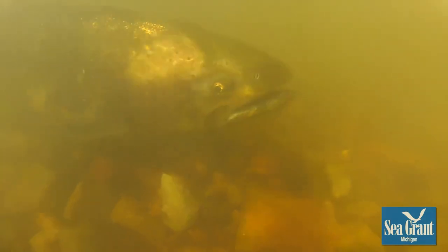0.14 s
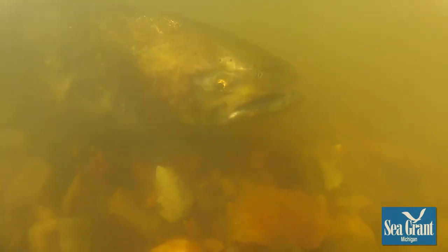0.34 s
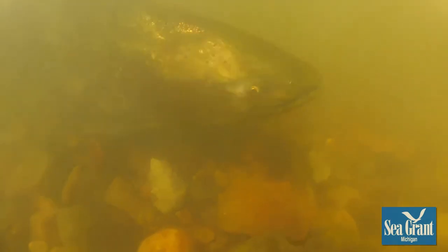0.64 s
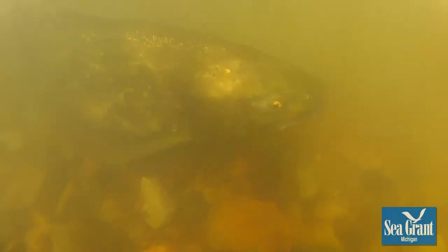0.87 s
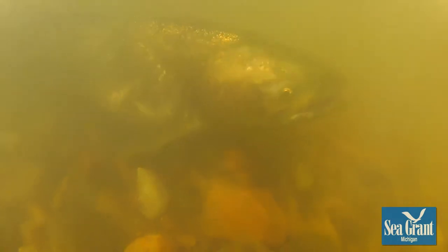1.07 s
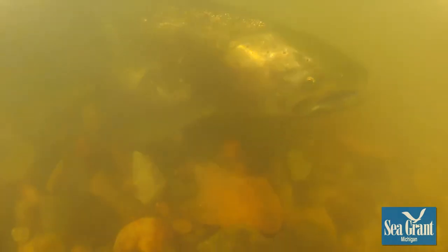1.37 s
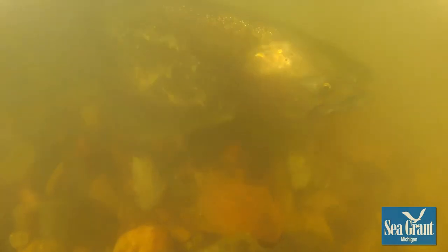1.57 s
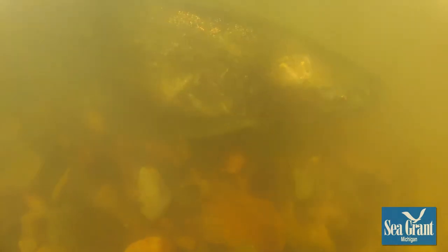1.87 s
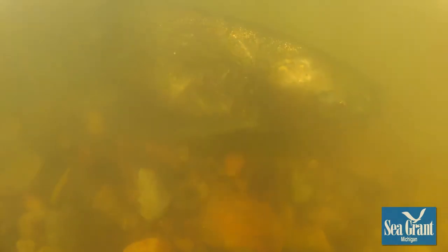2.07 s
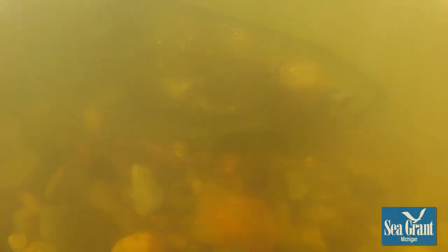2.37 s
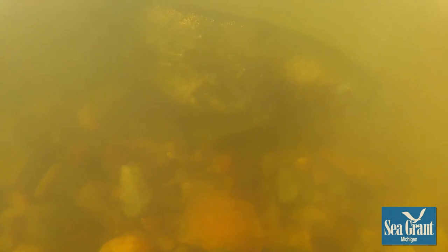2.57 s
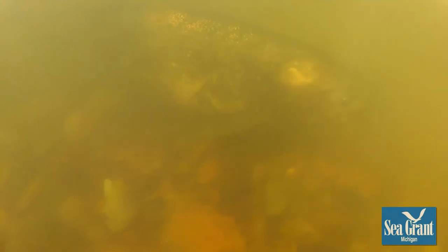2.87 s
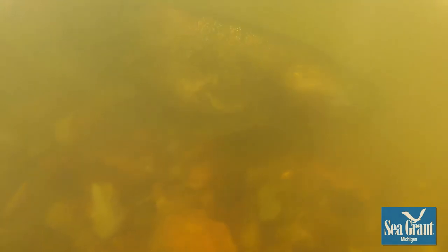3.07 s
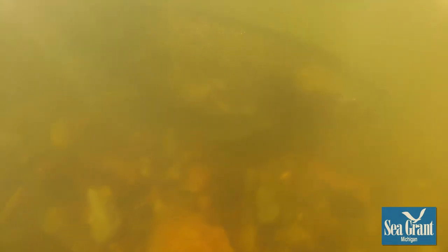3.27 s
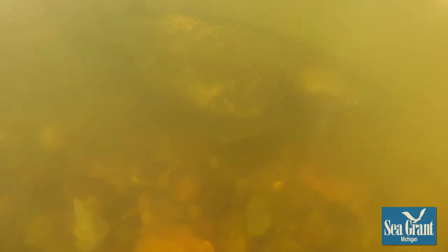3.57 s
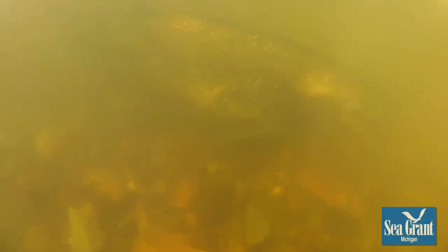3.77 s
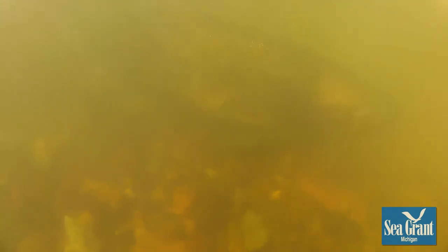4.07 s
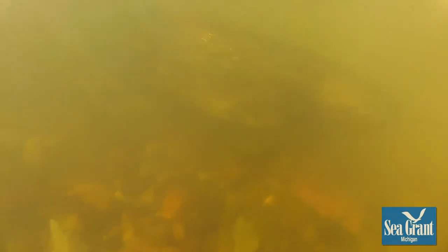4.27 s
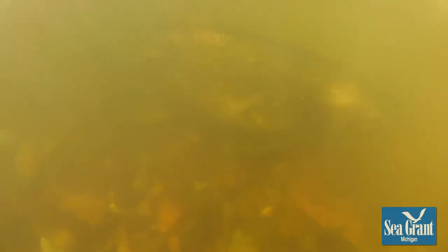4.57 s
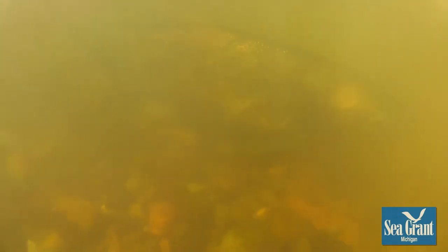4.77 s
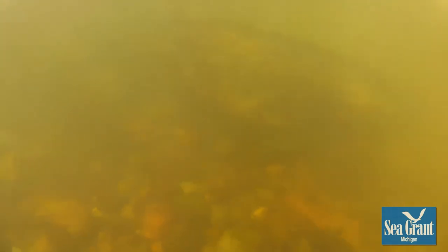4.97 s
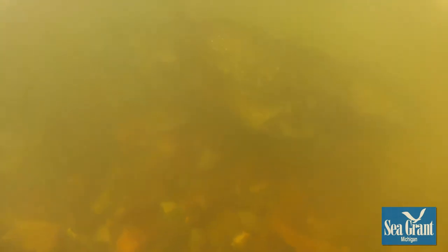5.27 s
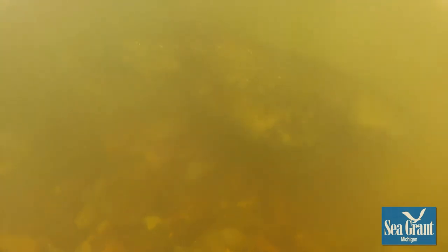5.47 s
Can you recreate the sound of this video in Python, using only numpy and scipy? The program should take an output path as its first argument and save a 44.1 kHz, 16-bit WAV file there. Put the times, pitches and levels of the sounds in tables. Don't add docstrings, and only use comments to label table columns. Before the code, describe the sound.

Underwater in a stony river, heard from inside a sealed camera housing on a pole. Deep uneven rumble runs throughout, with gritty hollow rubbing. Tiny bubble pings cluster at the start, then a couple of gurgling bloops. Rubbing thins in the middle, a hard knock lands near two and a half seconds, and scraping returns stronger with more knocks near the end. Close, muffled, lo-fi mono.

```python
import sys
import numpy as np
from scipy import signal
from scipy.fft import rfft, irfft
from scipy.io import wavfile
from scipy.ndimage import uniform_filter1d

SR = 44100
rng = np.random.default_rng(int(sys.argv[2]) if len(sys.argv) > 2 else 0)


def dump(signal):
    limited = np.clip(np.atleast_2d(signal).T, -1, 1)
    pcm = np.round(limited * 32767).astype(np.int16)
    wavfile.write(sys.argv[1], SR, pcm)


def to_linear_factor(level_db):
    exponent = np.asarray(level_db, float) / 20
    return 10 ** exponent


N = 248724
T = np.arange(N) / SR

# time in seconds, pressure in dB, slip speed in dB.
CONTACT_CURVE = [(0, -56, -6), (.23, -61, -7.5), (.35, -53, -7.5), (.8, -56, -5.5), (1.15, -56, -9.5),
                 (1.3, -72, -9), (1.5, -73, -9), (2.8, -76, -10), (2.95, -57, -3.5), (3.1, -55, -4.5),
                 (3.7, -60, -7), (3.9, -58.5, -5.5), (4.45, -54.5, -7.5), (4.63, -66, -3),
                 (4.75, -52.5, -4.5), (5.1, -52, -3), (5.43, -51.5, -6), (5.64, -54.5, -1)]
# middle in seconds, length in seconds, level in dB, thick-mode share in dB.
SCRAPE_EVENTS = [(0, 0.017, -47, -3), (.06, 0.063, -65, 9.5), (.282, 0.064, -49.5, -18),
                 (.37, 0.095, -56.5, 5.5), (.458, 0.014, -46.5, -11), (.705, 0.055, -55.5, -5),
                 (.917, 0.063, -53.5, -5), (1.012, .04, -58, -4), (1.12, 0.11, -53.5, -12),
                 (1.388, 0.038, -59.5, 1.5), (1.55, 0.07, -66.5, -5), (1.783, 0.047, -52.5, -6),
                 (1.89, 0.05, -52.5, -4), (2.18, 0.12, -58.5, -3.5), (2.414, .025, -68, -12),
                 (2.48, 0.031, -53.5, -4), (2.53, 0.067, -49.5, 1), (2.792, 0.03, -50.5, -9),
                 (3.274, .05, -52, -2), (3.5, 0.056, -55.5, 2.5), (3.62, 0.2, -52.5, -11),
                 (4.036, 0.031, -57.5, -3), (4.2, 0.044, -56.5, 3.5), (4.44, 0.2, -51.5, -4),
                 (4.668, 0.032, -52, 8), (4.9, .05, -55, -1), (4.981, 0.036, -54.5, 13),
                 (5.281, 0.058, -49.5, -6), (5.36, 0.076, -54, -18), (5.51, 0.12, -51.5, 0)]
SCRAPE_RISE = 0.42
FULL_PRESSURE_DB = -55


def level(x, db):
    return x * to_linear_factor(db) / np.sqrt(np.mean(x ** 2))


def columns(table):
    s, *cols = np.transpose(table)
    return [np.interp(T, s, c) for c in cols]


def walk(rate):
    k = int(SR / rate)
    points = rng.standard_normal(N // k + 2)
    joined = np.interp(np.arange(N) / k, np.arange(N // k + 2), points)
    return 1.62 * uniform_filter1d(joined, k)


def steep(x, hz, kind):
    return signal.sosfilt(signal.butter(4, hz, kind, fs=SR, output="sos"), x)


def band(x, low_hz, high_hz):
    return steep(steep(x, high_hz, "low"), low_hz, "high")


def resonate(x, modes, patchy_db=0.):
    out = 0
    for k, (hz, width, db) in enumerate(modes):
        push = x * to_linear_factor(patchy_db * walk(12)) if patchy_db else x
        mode = signal.lfilter(*signal.iirpeak(hz, hz / width, SR), push)
        out = out + (-1) ** k * to_linear_factor(db) * mode
    return level(out, 0)


def even(x, s, share):
    k = int(s * SR)
    power = uniform_filter1d(uniform_filter1d(x ** 2, k), k) + 1e-12
    return level(x / power ** (np.clip(share, 0, 1) / 2), 0)


def swells(table, share=0, rise=1):
    t = T[::32]
    power = 0
    for row in table:
        middle_s, length_s, db = row[:3]
        half_s = length_s * np.where(t < middle_s, rise, 1)
        bell = np.exp(-np.log(16) * ((t - middle_s) / half_s) ** 2)
        power = power + to_linear_factor(db + share * row[-1]) ** 2 * bell
    return np.interp(T, t, power)


def add(out, i, piece):
    out[i:i + len(piece)] += piece
    return out


def ring(out, s, hz, db, t60, glide=0., rise=0.0022):
    i = int(s * SR)
    t = T[:min(int(t60 * SR), N - i)]
    tone = np.sin(2 * np.pi * hz * t * (1 + glide * t / t60))
    return add(out, i, to_linear_factor(db - 60 * t / t60) * (1 - np.exp(-t / rise)) * tone)


def crack(out, s, db, t60):
    t = T[:int(.05 * SR)]
    snap = band(rng.standard_normal(len(t)), 980, 2800)
    return add(out, int(s * SR), to_linear_factor(db - 60 * t / t60) * snap)


def grit(rate, spread_db, smooth_db):
    chance = rng.random((2, N))
    happens = chance[0] < rate / SR
    size = to_linear_factor(-spread_db * np.log(chance[1] + 0.016))
    slips = happens * size * rng.standard_normal(N)
    return level(slips, 0) + to_linear_factor(smooth_db) * rng.standard_normal(N)


def rub_db():
    steady = to_linear_factor(columns(CONTACT_CURVE)[0]) ** 2
    return 10 * np.log10(steady + swells(SCRAPE_EVENTS, rise=SCRAPE_RISE))


def current():
    # frequency in Hz, width in Hz, level in dB.
    sway_modes = [(36.1, 7.8, -3), (50.7, 8.4, -13.5), (23, 13.5, -5.5)]
    shake_modes = [(97.7, 10.6, 6), (76.6, 43.6, 0), (107, 16.4, -3.5)]
    flutter_modes = [(127, 14, 1.5), (190.6, 13.7, -5)]
    # time in seconds, level in dB.
    flow_curve = [(0, -50), (.6, -46), (.95, -42.5), (1.8, -46), (2.2, -49.5), (2.7, -45.5), (3.1, -45.5),
                  (3.6, -47.5), (4.1, -47), (4.6, -48.5), (5.1, -44.5), (5.64, -48)]
    # middle in seconds, length in seconds, level in dB.
    large_eddies = [(0.031, 0.051, -34.5), (0.18, 0.034, -38.5), (0.464, 0.047, -37.5), (0.54, .05, -39),
                    (0.76, .04, -55), (0.84, 0.12, -41), (1.0, 0.1, -44), (1.212, 0.037, -43.5),
                    (1.43, 0.055, -45), (1.63, 0.032, -35.5), (1.799, 0.087, -46), (2.108, 0.066, -44.5),
                    (2.316, 0.075, -44.5), (2.816, 0.082, -40.5), (2.972, 0.041, -43),
                    (3.141, 0.091, -41.5), (3.53, 0.038, -44), (3.641, 0.032, -43), (3.78, 0.033, -44),
                    (4.009, 0.07, -42.5), (4.161, 0.046, -35), (4.279, 0.05, -39), (4.45, 0.14, -42),
                    (4.785, 0.053, -41), (5.172, 0.049, -37.5), (5.371, 0.074, -41.5), (5.5, .05, -45),
                    (5.639, 0.11, -37.5)]
    # middle in seconds, length in seconds, level in dB,
    # flutter share in dB.
    small_eddies = [(.05, 0.061, -41.5, -6.5), (.29, 0.073, -47, -1), (.44, 0.095, -41, -15.5),
                    (.66, 0.09, -48, -3.5), (1.05, 0.075, -46, -5), (1.22, 0.079, -49, -4),
                    (1.43, 0.056, -47, -6.5), (1.64, 0.049, -57, -8), (1.78, 0.11, -48, -6.5),
                    (1.85, 0.047, -42.5, -12), (1.95, 0.051, -39.5, -12), (2.22, 0.11, -46, -7.5),
                    (2.62, 0.057, -48, -14), (2.73, 0.043, -46, -25), (2.8, 0.042, -49.5, -3),
                    (2.94, 0.062, -46.5, -7.5), (3.4, 0.12, -54.5, 1), (3.55, 0.11, -57, 4.5),
                    (4.07, 0.053, -48.5, -3), (4.2, 0.29, -51.5, -1), (4.5, 0.1, -50.5, 0.5),
                    (4.7, 0.1, -42, -11), (4.88, .08, -44.5, -7.5), (5.15, 0.088, -46.5, -10),
                    (5.29, 0.041, -52.5, 5.5), (5.385, .09, -52.5, -2.5), (5.567, .11, -45.5, -10)]

    sway = steep(resonate(rng.standard_normal(N), sway_modes), 93.6, "low")
    shake = band(resonate(rng.standard_normal(N), shake_modes), 57, 133)
    flutter = band(resonate(rng.standard_normal(N), flutter_modes), 115, 243)

    flow_db = columns(flow_curve)[0]
    shake_db = flow_db - 11
    flutter_db = flow_db - 12 + 0.51 * (rub_db() - FULL_PRESSURE_DB)
    sway_gain = np.sqrt(to_linear_factor(flow_db) ** 2 + swells(large_eddies))
    shake_gain = np.sqrt(to_linear_factor(shake_db) ** 2 + swells(small_eddies))
    flutter_gain = np.sqrt(to_linear_factor(flutter_db) ** 2 + swells(small_eddies, 1))
    return (even(sway, 0.14, 0.53) * sway_gain
            + even(shake, 0.087, 0.5) * shake_gain
            + even(flutter, 0.087, 0.54) * flutter_gain)


def rubbing():
    # frequency in Hz, width in Hz, level in dB.
    thick_modes = [(221.3, 29, -1), (251, 43, 2.5), (300, 36, -2.5), (371.5, 35, -6)]
    early_shell_modes = [(393.4, 85, 0.5), (488, 16.5, 5), (579, 129, 0.5), (687.4, 59, 2.5),
                         (847, 380, -10), (1123, 430, -9.5), (1196, 76, -2.5), (1350, 67, -8.5),
                         (1473, 68, -10.5), (1660, 290, -13)]
    late_shell_modes = [(414, 163, -9.5), (486, 64, -1), (600.4, 40, 2), (667, 54, -0.5), (714, 59, -4),
                        (893, 34, -5), (984, 31, -9), (1064, 78, -12), (1315, 63, -4), (1640, 210, -19.5),
                        (1698, 41, -16)]
    bright_modes = [(2164, 360, 1), (2722, 62, 1), (3000, 92, -3.5), (3610, 430, -8.5), (4400, 760, -14),
                    (5220, 320, -16)]
    grip_change_s, grip_fade_s = 2.9, 0.062

    db = rub_db()
    pressure_db, speed_db = columns(CONTACT_CURVE)
    slips = grit(1200, 1.6, 2.9) * to_linear_factor(2.8 * walk(35))
    late = np.clip((T - grip_change_s) / grip_fade_s, 0, 1)
    early_shell = resonate(slips, early_shell_modes, patchy_db=1.5)
    late_shell = resonate(slips, late_shell_modes, patchy_db=2.5)
    shell = (1 - late) * early_shell + late * late_shell

    hollow = even(band(shell, 375, 816), 0.035, 0.85)
    scratch = even(band(shell, 940, 2370), 0.036, 0.82)
    thick = even(band(resonate(slips, thick_modes), 171, 398), 0.041, 0.44)
    bright = steep(resonate(slips, bright_modes, patchy_db=2.0), 2160, "high")

    bright_db = FULL_PRESSURE_DB - 13 + speed_db + 1.5 * late + 0.8 * (db - FULL_PRESSURE_DB)
    thick_db = -61 + 0.48 * (pressure_db - FULL_PRESSURE_DB)
    thick_gain = np.sqrt(to_linear_factor(thick_db) ** 2 + swells(SCRAPE_EVENTS, 0.95, SCRAPE_RISE))
    return (to_linear_factor(db) * (hollow + scratch * to_linear_factor(speed_db))
            + thick * thick_gain
            + even(bright, 0.022, 0.66) * to_linear_factor(bright_db))


def knocks():
    # start in seconds, body peak in dB, bass in dB, shell in dB,
    # decay t60 in seconds.
    blows = [(0.278, -61, -37.5, -47, 0.18), (0.448, -57, -44, -56, 0.11), (1.106, -64, -44, -35, 0.31),
             (1.77, -55.5, -42, -53, 0.1), (2.511, -22.5, -25, -32, 0.15), (2.785, -42, -61, -51, 0.28),
             (4.664, -41.5, -48.5, -27.5, 0.17), (4.969, -30, -34, -35, 0.17),
             (4.979, -34, -24.5, -35, 0.33), (5.275, -38.5, -40, -53, 0.24)]
    # frequency in Hz, level in dB, decay t60 in seconds.
    bass_modes = [(43.4, -1, 0.48), (97, -6, 0.3), (136.5, -7.5, 0.28)]
    body_modes = [(240.8, -5, 0.32), (332, -1, 0.04), (478, 4, 0.031), (905, -3.5, 0.019)]
    # frequency in Hz, level in dB, share of the blow's t60.
    shell_modes = [(601, -2, 1), (640, 0.5, 0.25), (890, -6, 0.24), (1280, -28.5, 0.36)]

    out = np.zeros(N)
    for s, body_db, bass_db, shell_db, t60 in blows:
        out = crack(out, s + 0.00141, body_db - 25.0, 0.09)
        for hz, db, ring_s in bass_modes:
            out = ring(out, s + 0.0046, hz, bass_db + db + 3.0, ring_s, rise=0.0027)
        for hz, db, ring_s in body_modes:
            out = ring(out, s + 0.0018, hz, body_db + db - 5.5, ring_s)
        for hz, db, share in shell_modes:
            out = ring(out, s, hz, shell_db + db - 11.0, share * t60)
    return out


def bubbles():
    # start in seconds, peak in dB, pitch in Hz, t60 in seconds.
    pings = [(0.0473, -38.5, 1670, 0.0073), (0.0574, -56, 2700, 0.044), (0.0712, -51, 2370, 0.041),
             (0.0912, -61, 5400, 0.019), (0.0944, -50.5, 1660, 0.036), (0.1346, -52, 3630, 0.031),
             (0.185, -40.5, 2420, 0.032), (0.185, -59, 5730, 0.026), (0.204, -53, 2160, 0.035),
             (0.4888, -53.5, 2330, 0.045), (1.4381, -59, 2330, 0.046), (1.9934, -61.5, 2530, 0.056),
             (2.3032, -57, 2430, 0.04), (2.3585, -60, 4770, 0.019), (2.374, -52, 2210, 0.037),
             (2.4573, -60, 1990, 0.044), (2.6309, -51.5, 2020, 0.021), (2.7444, -65, 1450, 0.045)]
    # start in seconds, peak in dB, pitch in Hz, t60 in seconds, swell in seconds.
    gurgles = [(0.276, -30, 535, 0.055, .002), (0.294, -32.5, 576, 0.078, .006),
               (0.444, -21.5, 523, 0.088, 0.021), (2.411, -60.5, 434, 0.22, .003),
               (2.479, -52, 622, 0.26, .003), (3.03, -42, 486, 0.045, 0.0017),
               (5.325, -45, 3135, 0.098, 0.013), (5.342, -35, 572, 0.082, .006)]

    out = np.zeros(N)
    for s, db, hz, t60 in pings:
        glides = hz < 3000
        out = ring(out, s, hz, db - 1.0, t60, -0.082 * glides, rise=1.0 / hz)
        out = crack(out, s, db + (1.5 if glides else -22), 0.013)
    for s, db, hz, t60, swell_s in gurgles:
        out = ring(out, s, hz, db, t60, 0.268 * (hz < 3000), rise=swell_s)
    return out


def hiss():
    # frequency in Hz, density in dB per Hz.
    hiss_colour = [(88, -42), (150, 1), (242, -6.5), (697, -24.5), (826, -21.5), (891, -16.5), (1620, -25),
                   (2080, -21), (2530, -22), (5900, -29), (7670, -60), (13000, -120)]
    hz, db = np.transpose(hiss_colour)
    out = 0
    for centre_hz in 170 * 2 ** np.arange(0, 5.2, 1 / 3):
        third = signal.lfilter(*signal.iirpeak(centre_hz, 4, SR), rng.standard_normal(N))
        colour_db = np.interp(np.log(centre_hz), np.log(hz), db)
        out = out + to_linear_factor(colour_db + 1.3 * walk(9)) * third
    return level(out, -65)


def scene():
    return (current() + rubbing() + knocks() + bubbles() + hiss())[None]


def roll_off(x):
    return signal.sosfilt(signal.butter(12, 10900, fs=SR, output="sos"), x)


def record(dry):
    hold_hz, top_hz = 12000, 10950
    kept = signal.sosfilt(signal.butter(14, 5650, fs=SR, output="sos"), dry)
    sampled = kept * (1 + 2 * np.cos(2 * np.pi * hold_hz * T))
    slope_power = uniform_filter1d(np.diff(kept, prepend=0) ** 2, int(0.006 * SR))
    slope = np.sqrt(slope_power + to_linear_factor(-88) ** 2) ** 0.89
    steps = band(slope * rng.standard_normal(N), 7000, 9400)
    hz = np.fft.rfftfreq(N, 1 / SR)
    hold = np.sinc(hz / hold_hz) * (hz < top_hz)
    held = irfft(rfft(sampled + level(steps, -73)) * hold, N)
    return roll_off(held)


dry = scene()
out = record(dry)
dump(out)
```